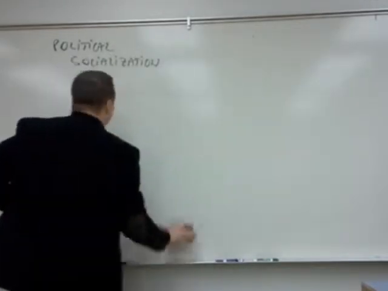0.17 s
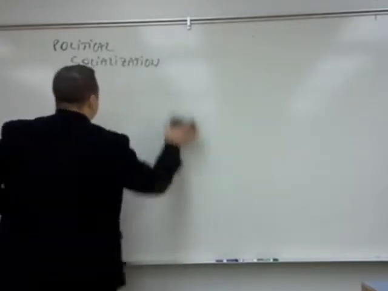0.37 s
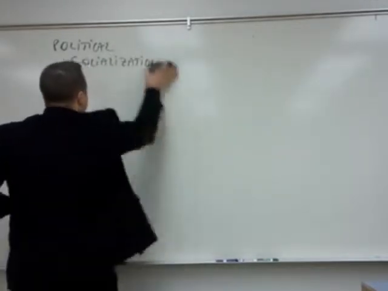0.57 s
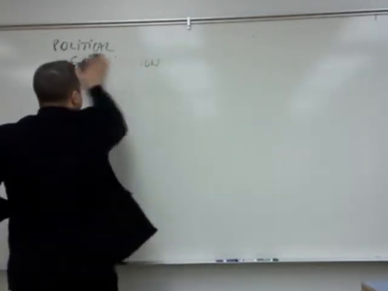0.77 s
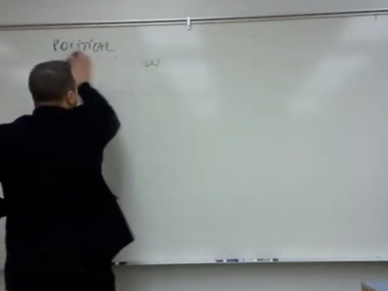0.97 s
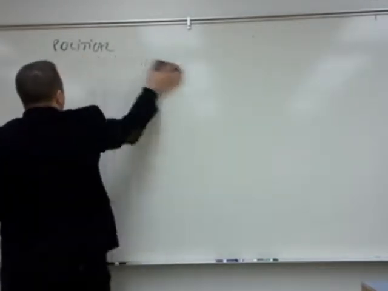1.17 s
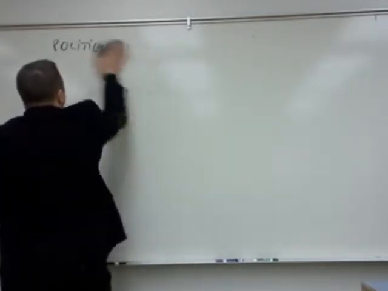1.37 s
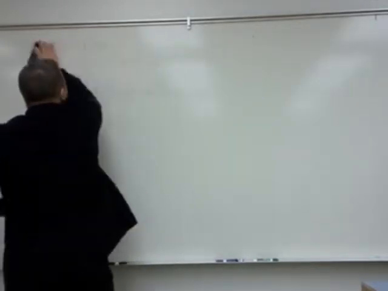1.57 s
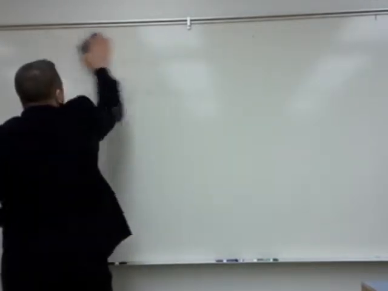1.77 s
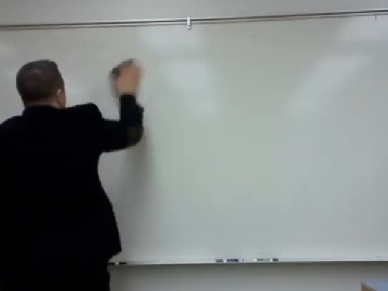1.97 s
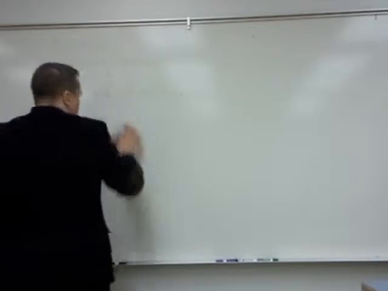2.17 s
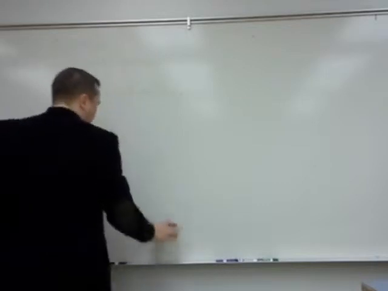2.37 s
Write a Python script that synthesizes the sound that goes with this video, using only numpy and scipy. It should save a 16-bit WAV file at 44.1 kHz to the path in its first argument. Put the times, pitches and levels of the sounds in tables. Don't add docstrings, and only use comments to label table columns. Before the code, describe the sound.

A felt eraser wipes a whiteboard in quick hissing strokes, then is set down with soft thuds

```python
import sys
import numpy as np
from scipy import signal
from scipy.io import wavfile
from scipy.ndimage import uniform_filter1d

SR = 44100
rng = np.random.default_rng(int(sys.argv[2]) if len(sys.argv) > 2 else 0)


def makeup_ratio(level_db):
    decades = np.asarray(level_db, float) / 20
    return 10 ** decades


def file_out(sig):
    cols = np.atleast_2d(sig).T
    lim = np.clip(cols, -1, 1)
    pcm = np.round(lim * 32767).astype(np.int16)
    wavfile.write(sys.argv[1], SR, pcm)


N = 106104


def rms_one(x):
    return x / np.sqrt(np.mean(x ** 2) + 1e-20)


def in_time(rows, outside=None):
    s, *columns = np.transpose(rows)
    t = np.arange(N) / SR
    return [np.interp(t, s, column, outside, outside) for column in columns]


def at_hz(points, hz):
    table_hz, value = np.transpose(points)
    return np.interp(np.log(hz), np.log(table_hz), value)


def drift(rate_hz):
    r = np.exp(-80 * np.pi * rate_hz / SR)
    noise = rng.standard_normal(N // 40 + 2002)
    slow = signal.lfilter([1], [1, -2 * r, r * r], noise)[2000:]
    return np.interp(np.arange(N) / 40, np.arange(len(slow)), rms_one(slow - slow.mean()))


# frequency in Hz, left-right likeness from -1 to 1.
STEREO_LIKENESS = [(60, 0.99), (150, 0.9), (370, 0.77), (930, 0.076), (2310, 0.19), (5770, -0.045),
                   (14400, -0.15)]


def coloured(source, spectrum, patchy_db, rate_hz):
    out = 0
    together = drift(rate_hz)
    edges = 25 * 2 ** np.arange(0, 9.5, .4)
    for k, (low, high) in enumerate(zip(edges, edges[1:])):
        hz = np.sqrt(low * high)
        if hz < spectrum[0][0] / 2:
            continue
        band = signal.butter(2, [low, high], "band", fs=SR, output="sos")
        mid, side = signal.sosfilt(band, source[k % 2])
        alike = np.clip(at_hz(STEREO_LIKENESS, hz), -1, 1)
        flicker_db = patchy_db * (together + 0.68 * drift(rate_hz))
        gain = makeup_ratio(at_hz(spectrum, hz) + flicker_db)
        stereo = np.sqrt(1 + alike) * mid + np.sqrt(1 - alike) * side * [[1], [-1]]
        out = out + gain * stereo
    return rms_one(out)


# frequency in Hz, level in dB per Hz.
VENTILATION = [(30, -29.5), (60, -3.5), (95, -8), (150, -6.5), (300, -11), (700, -19.5), (2000, -25),
               (14000, -31)]
HUM_HZ = [88, 120, 136, 360, 600, 720, 1200, 1680]
# level in dB rms, steady share from 0 to 1, waver in Hz.
HUM_LINES = [(-66.5, 0.088, 4.6), (-67.5, 0.14, 15.3), (-65, 0.089, 9.8), (-65.5, 0.9, 16.5),
             (-76.5, 0.69, 9.3), (-80, 0.49, 6.5), (-84, 0.2, 9.5), (-85.5, 0.28, 3.5)]


def background():
    t = np.arange(N) / SR
    hum = 0
    for hz, (db, steady, waver_hz) in zip(HUM_HZ, HUM_LINES):
        steady = np.clip(steady, 0, 1)
        waver = drift(waver_hz) + 1j * drift(waver_hz)
        swing = np.sqrt(2 * steady) + np.sqrt(1 - steady) * waver
        hum = hum + makeup_ratio(db) * np.real(swing * np.exp(2j * np.pi * (hz * t + rng.random())))
    air = coloured(rng.standard_normal((2, 2, N)), VENTILATION, patchy_db=0.8, rate_hz=4.0)
    return makeup_ratio(-57) * air + hum


def clicks_at(s, level_db):
    clicks = np.full(N, 1e-18)
    clicks[(s * SR).astype(int)] = makeup_ratio(level_db)
    return clicks


def struck(s, level_db, modes, spread_db):
    out = np.zeros(N)
    chance_db = spread_db * rng.standard_normal((len(s), len(modes)))
    for k, (hz, mode_db, t60_s) in enumerate(modes):
        clicks = clicks_at(s, level_db + mode_db + chance_db[:, k])
        r = makeup_ratio(-60 / (t60_s * SR))
        w = 2 * np.pi * hz / SR
        out += signal.lfilter([0, np.sin(w)], [1, -2 * r * np.cos(w), r * r], clicks)
    return out


# start in seconds, level in dB, sharp tick in dB relative to it.
KNOCKS = [
    (.045, -69, -27),
    (.2105, -54.5, 8),
    (.779, -67, -2),
    (1.07, -65.5, 1),
    (2.17, -72, -25),
]
# frequency in Hz, level in dB, T60 in seconds.
TRAY_MODES = [(117, -10, 0.13), (310, -49, 0.054), (508, -4, 0.14), (595, -5, 0.035), (747, 0.5, 0.15),
              (1301, 1, 0.054), (1540, 1, 0.039)]
# start in seconds, level in dB.
SET_DOWN = [
    (2.3745, -47),
    (2.399, -50),
]
# frequency in Hz, level in dB, T60 in seconds.
HOLLOW_MODES = [(100, -6, .08), (460, 0, .07), (580, -5, .06), (790, -12, .04)]


def knocks():
    s, level_db, tick_db = np.transpose(KNOCKS)
    tick_t60_s = 0.018
    dying = signal.lfilter([1], [1, -makeup_ratio(-60 / (tick_t60_s * SR))], clicks_at(s, level_db + tick_db))
    bright = signal.butter(2, [1510, 10800], "band", fs=SR, output="sos")
    tick = dying * signal.sosfilt(bright, rng.standard_normal((2, N)))
    ring = struck(s, level_db, TRAY_MODES, spread_db=1.0)
    thud = struck(*np.transpose(SET_DOWN), HOLLOW_MODES, spread_db=-1)
    return ring + thud + tick


def fibres():
    snaps_per_s, snap_share = 5000, 0.31
    snaps = (rng.random(N) < snaps_per_s / SR).astype(float)
    power = 1 - snap_share + snap_share * rms_one(snaps) ** 2
    return rng.standard_normal((2, 2, N)) * np.sqrt(power)


# time in seconds, felt hiss in dB, rasp in dB relative to the hiss.
LIFT = [
    (.11, -70, 0),
    (.154, -59, -19),
    (.198, -60, -6),
    (.204, -47, -10.5),
    (.235, -54, -5),
    (.3, -58, 1),
    (.355, -62, 2),
    (.38, -77, 8),
]
# time in seconds, felt hiss in dB, rasp in dB relative to the hiss.
WIPE = [(0.779, -67, 0.5), (.81, -52, -11.5), (.87, -48.5, -7), (.99, -50, -10), (1.055, -60.5, -11),
        (1.076, -50, -7), (1.12, -53.5, -9), (1.15, -48, -17.5), (1.3, -46, -25.5), (1.36, -50.5, -12.5),
        (1.6, -45.5, -13), (1.7, -48, -11.5), (1.725, -55, -11), (1.78, -47.5, -32), (1.9, -45, -22),
        (2.09, -48, -14.5), (2.164, -46.5, -14), (2.25, -63, -19)]
# time in seconds, felt hiss in dB, rasp in dB relative to the hiss.
RETURN = [
    (2.345, -98, -20),
    (2.37, -68.5, 0),
    (2.41, -62.5, -4),
]
# frequency in Hz, level in dB per Hz.
FELT = [(2500, -31.5), (4000, -7), (5500, -3.5), (7500, -2.5), (10000, -1.5), (12500, -6), (15000, 4.5)]
# frequency in Hz, level in dB per Hz.
RASP = [(300, 5), (750, 3), (1300, 3.5), (2000, 2.5), (3000, 9), (4500, 2), (7000, -0.5), (12000, -33)]


def eraser():
    hiss, rasp = 0, 0
    for table in (LIFT, WIPE, RETURN):
        level_db, rasp_db = in_time(table)
        level_db, = in_time([row[:2] for row in table], -200)
        level_db = level_db - in_time(GAIN)[0]
        hiss = hiss + makeup_ratio(level_db - 2)
        rasp = rasp + makeup_ratio(level_db + rasp_db + 2.5)
    felt = coloured(fibres(), FELT, patchy_db=.4, rate_hz=35)
    board = coloured(fibres(), RASP, patchy_db=.5, rate_hz=30)
    return hiss * felt + rasp * board


def classroom(x):
    t60_s, level_db = 0.39, -12
    t = np.arange(SR // 2) / SR
    tail = rng.standard_normal((2, len(t))) * makeup_ratio(-60 * t / t60_s) * (t > .008)
    tail /= np.sqrt(np.sum(tail ** 2, axis=1, keepdims=True))
    return makeup_ratio(level_db) * signal.fftconvolve(x, tail, axes=1)[:, :N]


def scene():
    near = eraser() + knocks()
    return near + classroom(near) + background()


def masking(x):
    hz, _, z = signal.stft(x, SR, nperseg=2048, noverlap=1536)
    power = uniform_filter1d(np.abs(z) ** 2, size=5, axis=2) + 1e-24
    around = uniform_filter1d(power, size=25, axis=1)
    treble = power[:, (hz > 6500) & (hz < 9000)].mean(axis=(0, 1))
    limit = makeup_ratio(2 * -16.5) * treble
    limit = np.minimum(limit, 1.3 * around)
    maskable = ((hz > 800) & (hz < 5200))[:, None]
    keep = np.where(maskable, 1 / (1 + (limit / power) ** 6), 1)
    lost = around / (uniform_filter1d(power * keep ** 2, size=25, axis=1) + 1e-24)
    kept = z * keep * np.sqrt(np.clip(lost, 1, 6))
    return signal.istft(kept, SR, nperseg=2048, noverlap=1536)[1][:, :N]


def top_cut(x):
    return signal.sosfilt(signal.butter(12, 14560, fs=SR, output="sos"), x)


# time in seconds, gain in dB.
GAIN = [(0, 2), (.1, 1.1), (.7, 0.83), (.95, 2.5), (1.45, 4), (2.15, 4), (2.3, -0.2), (2.41, -1.2)]
# resonance lift in dB, sensitivity in dB.
PORTS = [(13, -0.1), (10.5, -2)]
# frequency in Hz, width in Hz.
PORT_SHAPES = [(7050, 850), (8350, 1700)]


def record(dry):
    out = []
    for x, (hz, width_hz), (lift_db, sens_db) in zip(dry, PORT_SHAPES, PORTS):
        r = np.exp(-np.pi * width_hz / SR)
        poles = [1, -2 * r * np.cos(2 * np.pi * hz / SR), r * r]
        peak = signal.lfilter([(1 - r * r) / 2, 0, (r * r - 1) / 2], poles, x)
        out.append(makeup_ratio(sens_db) * (x + makeup_ratio(lift_db) * peak))
    bass_cut = signal.butter(2, 45, "high", fs=SR, output="sos")
    out = signal.sosfilt(bass_cut, out) * makeup_ratio(in_time(GAIN)[0])
    return top_cut(masking(out))


dry = scene()
out = record(dry)
file_out(out)
```